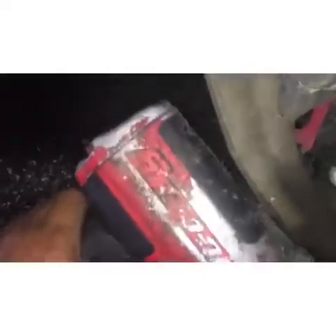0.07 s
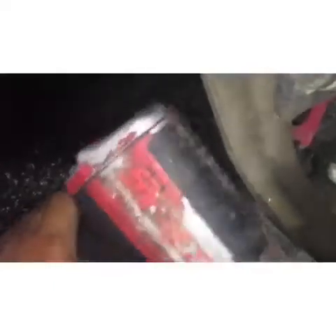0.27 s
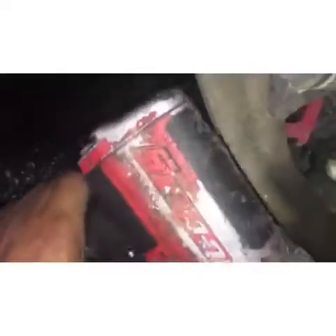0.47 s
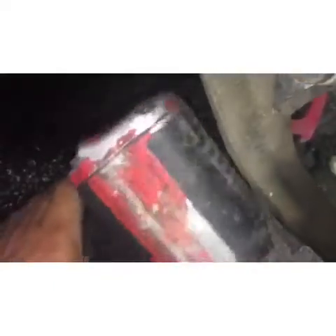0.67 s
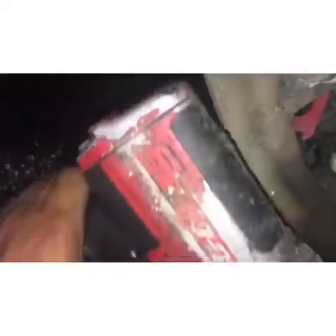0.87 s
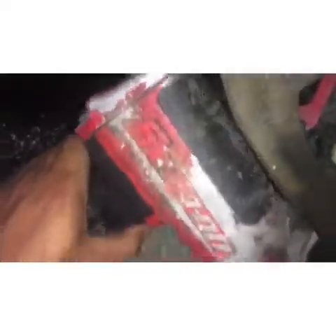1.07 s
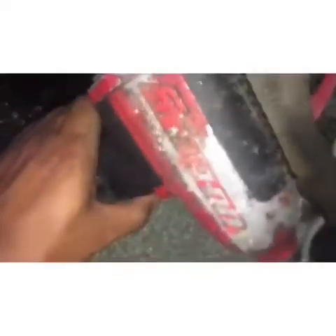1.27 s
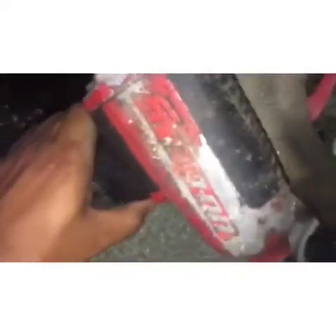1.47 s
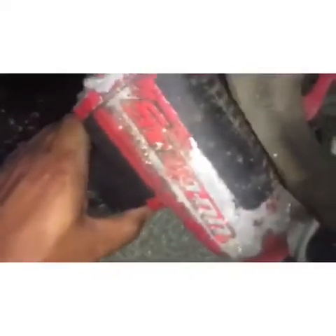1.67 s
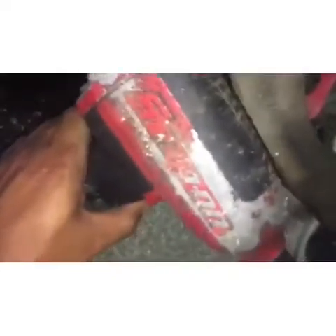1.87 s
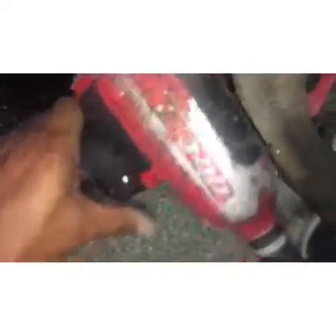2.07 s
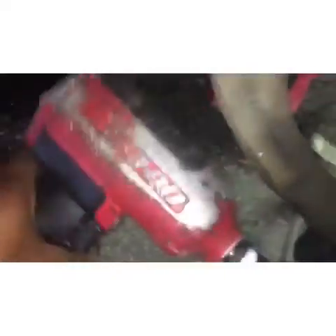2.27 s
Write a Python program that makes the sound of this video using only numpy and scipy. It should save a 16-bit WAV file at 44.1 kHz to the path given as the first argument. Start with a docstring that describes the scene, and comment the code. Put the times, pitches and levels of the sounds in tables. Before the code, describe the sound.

An air impact wrench, very close. A low wavering machine hum sinks as air hisses in at 0.15 s; sharp cracking blows with bassy thumps run 0.2-0.4 s, then steel rings on. A second burst comes at 0.7-0.8 s, ringing again. From 1.1 to 2.05 s it hammers steadily, nearly thirty blows a second, until the freed motor whines up briefly and runs down by 2.3 s.

```python
"""Under a car in a workshop, very close to an air impact wrench on a tight bolt: a wavering machine hum, which
the recorder's gain control turns down (a drawn level curve) as the hammering starts. Two short bursts, then a
long run until the bolt gives. Each blow is a noise crack and clang through case resonances, a thump gliding
down in pitch, a bounce and a rattle. In the pauses struck steel rings on as wandering sines; exhaust air is
coloured noise. At the end the freed motor whines in harmonics and runs down; a faint workshop tail lies behind."""
import sys
import numpy as np
from scipy import signal
from scipy.fft import rfft, irfft
from scipy.io import wavfile

SR = 44100
rng = np.random.default_rng(int(sys.argv[2]) if len(sys.argv) > 2 else 0)


def to_wav(s):
    """Save 16-bit WAV."""
    ch = np.atleast_2d(s).T  # columns
    pcm = np.round(np.clip(ch, -1, 1) * 32767)  # PCM
    wavfile.write(sys.argv[1], SR, pcm.astype(np.int16))


N = 101429
TIME = np.arange(N) / SR  # s

# level of the workshop hum as heard, turned down by the recorder's gain control when the hammering
# starts, partly recovering later: (time [s], level [dB])
HUM_LEVEL = [(0, -34.5), (.19, -34.5), (.3, -57), (1.0, -64), (2.3, -55.5)]
# spectrum of the low workshop noise: (frequency [Hz], relative density [dB per Hz])
BACKGROUND_SPECTRUM = [(30, -4), (170, 0), (300, -14), (450, -31), (1200, -28), (2500, -41), (15000, -60)]
HUM_HZ, HUM_WOBBLE, HUM_OCTAVE_DB = 106, .03, -19  # wobble: rms fraction of pitch
BACKGROUND_DB = -6  # relative to the hum

# spectrum of the diffuse workshop tail: (frequency [Hz], relative density [dB per Hz])
ROOM_SPECTRUM = [(60, -15), (500, -9), (1500, 0), (4300, 0), (5200, -5), (9000, -8), (11000, -13),
                 (16000, -17)]
ROOM_DB, ROOM_T60_S = -29, 0.61

# long ring of the bolted steel parts: (frequency [Hz], relative level [dB], t60 [s])
STEEL_MODES = [(688, -5, 0.33), (834, -5, 0.26), (1139, 1.5, 0.64), (1387, 0, 0.34), (1707, -2.5, 0.35),
               (1924, -4, 0.43), (2546, -11, 0.59), (3450, -12.5, .4), (4320, -11.5, 0.67)]
STEEL_DB, STEEL_MAIN_HZ, STEEL_WANDER_HZ = -23.5, 1141, 2.5

# trigger pulls: (valve opens [s], air fully on [s], hammering ends [s],
#                 exhaust level [dB], drive of the main steel mode [dB])
PULLS = [(0.148, 0.219, 0.412, -19.5, -4.5), (0.628, 0.66, 0.82, -22, 2.5), (1.018, 1.033, 2.050, -31, 5)]

# motor as the bolt turns and after: (time [s], vane rate [Hz], whine level [dB], air level [dB])
MOTOR_RUN = [(1.899, 380, -48, -56), (2.01, 448, -38, -54), (2.062, 512, -39, -36), (2.08, 485, -41, -40),
             (2.097, 415, -31, -38), (2.135, 298, -32.5, -40), (2.155, 338, -39, -37.5),
             (2.19, 322, -44, -45), (2.258, 298, -48, -49), (2.30, 285, -66, -55)]
# harmonics of the vane rate, from the first up: (relative level [dB])
MOTOR_ORDERS_DB = [0, -6, -14, -13, -11, -12, -17]
# spectrum of the air puffed by the vanes: (frequency [Hz], relative density [dB per Hz])
MOTOR_AIR_SPECTRUM = [(90, -20), (300, -6), (450, -10), (720, -3), (1500, -7), (4200, -14), (5000, -20),
                      (15000, -35)]
START_HZ, START_DB, START_FADE_S = 315, -35, .04
MOTOR_WOBBLE = .015  # rms fraction of the vane rate
MOTOR_BLUR_AT_S, MOTOR_BLUR_CYCLES = 2.14, .3
PORT_HZ, PORT_WIDTH_HZ, PORT_GAIN = 800, 240, 2.8

# spectrum of the exhaust rush: (frequency [Hz], relative density [dB per Hz])
EXHAUST_SPECTRUM = [(60, 4), (550, -8.5), (900, -0.5), (1500, -1), (2800, -4), (4500, -7), (10000, -8.5),
                    (16000, -11)]
VALVE_DB, VALVE_HZ, VALVE_WIDTH_HZ, VALVE_OPEN_S = -38, 6670, 5200, .008
AIR_RELEASE_DB_PER_S, AIR_OPENING_POWER = 711, 2.6

# hammer blows: (time [s], relative crack level [dB], relative clang level [dB], relative thump level [dB])
BLOWS = [(0.2069, -4, -16, -57), (0.2601, -5, -15, -23.5), (0.286, -1.5, -13.5, -21),
         (0.312, -9, -30, -19.5), (0.3396, 1, -11.5, -13.5), (0.369, 1.5, -16, -15.5), (0.4, 3, -16.5, -18),
         (0.689, -4, -13, -21.5), (0.7206, -2.5, -18, -20), (0.7541, 2, -15, -22.5),
         (0.7853, 0.5, -17.5, -19.5), (0.818, -2, -17.5, -24), (1.086, 1.5, -14, -18),
         (1.1159, -3, -16.5, -18), (1.1497, -1, -15, -21), (1.1815, -1, -16, -21), (1.216, 0, -17.5, -21),
         (1.251, -2.5, -13.5, -29), (1.2856, -1.5, -17.5, -23), (1.3211, -1.5, -17.5, -25.5),
         (1.358, -2.5, -18, -19.5), (1.397, -1.5, -17, -23.5), (1.436, 0.5, -16, -21.5),
         (1.476, -3.5, -17, -22.5), (1.513, -3.5, -22.5, -22.5), (1.5505, -1.5, -17, -19.5),
         (1.589, 0, -17, -21), (1.6273, -1, -16.5, -18.5), (1.6645, -1, -16.5, -20),
         (1.7019, -0.5, -17, -32), (1.7388, -0.5, -17, -20.5), (1.7786, -0.5, -18, -21.5),
         (1.814, -4.5, -17, -17), (1.8475, -4, -20, -20.5), (1.8806, -1.5, -22.5, -20.5),
         (1.9124, -1, -17.5, -20), (1.9476, -4, -21.5, -16.5), (1.9862, -1.5, -22.5, -34),
         (2.0424, -4, -24, -25.5)]
SHUDDER_DB, SHUDDER_DECAY_S, SHUDDER_LOW_HZ, SHUDDER_HIGH_HZ = -5.5, .015, 45, 170
# the pitch and times of a thump hold before its stretch
THUMP_DROP_HZ, THUMP_FALL_S, THUMP_END_HZ = 1050, .00078, 20
THUMP_LAG_S, THUMP_RISE_S, THUMP_DECAY_S = 0.00065, 0.00066, 0.0096
THUMP_STRETCH_PER_DB, THUMP_USUAL_DB, THUMP_VARY = .015, -21, .15
THUMP_DB, THUMP_ROUGH = 11.5, 0.13

# lighter knocks of the trigger, hammer and loose socket: (time [s], relative level [dB])
KNOCKS = [(0.1518, -32), (0.2113, 1), (0.2944, -9.5), (0.2984, 2.5), (0.318, -5), (0.323, -1.5), (0.33, -4),
          (0.3513, -1), (0.3822, -4), (0.4412, -6.5), (0.659, -11), (0.6691, -4), (0.6734, -3),
          (0.7039, -2), (0.709, -3), (0.7358, -2.5), (0.7971, -2.5), (1.037, -11.5), (1.0526, -4),
          (1.07, -3.5), (1.075, -1.5), (1.0993, -2.5), (1.1323, -5.5), (1.1673, -7), (1.83, -6.5),
          (1.8624, -5.5), (1.973, -8), (1.999, -17), (2.0248, -15.5), (2.0857, -16), (2.1518, -23.5),
          (2.2108, -30)]
# spectrum of the bright steel crack: (frequency [Hz], relative density [dB per Hz])
CRACK_SPECTRUM = [(300, -44.5), (1500, -10.5), (2600, -0.5), (4300, 3.5), (4900, -0.5), (6000, 4),
                  (7400, -1.5), (8600, 3), (9800, 4.5), (10400, -3.5), (11300, 0.5), (13500, -4),
                  (16000, -16.5)]
# spectrum of the slower steel clang: (frequency [Hz], relative density [dB per Hz])
CLANG_SPECTRUM = [(100, 0.5), (250, -3), (450, -5), (700, -0.5), (950, -4.5), (1200, 1.5), (1550, -1),
                  (2100, -3.5), (2700, -11), (5000, -18)]
# short resonances of the hammer case and socket: (frequency [Hz], width [Hz], middle gain [dB])
CASE_MODES = [(1585, 144, -9.5), (2004, 60, -4.5), (2490, 28.2, -3.5), (3140, 50, -5), (3547, 40, -4.5),
              (4180, 63, -11), (5640, 78, -9), (6520, 210, -14), (8430, 84, -4), (9440, 77, -12)]
CASE_VARY_DB, CASE_VARY_PER_S = 5, 25
CRACK_DB, CRACK_RISE_S, CRACK_DECAY_S = -6.5, .00045, 0.0016
CRACK_TAIL_DB, CRACK_TAIL_S = -9, 0.0051
CLANG_DB, CLANG_RISE_S, CLANG_DECAY_S = 3.5, 0.0011, 0.0061
KNOCK_CRACK_DB, KNOCK_CLANG_DB = 1, -13.5
BOUNCE_S, BOUNCE_SPREAD_S, BOUNCE_DB, BOUNCE_CLANG_DB = 0.0063, 0.00052, -6, -5.5
RATTLE_AFTER_S, RATTLE_WIDTH_S, RATTLE_SPREAD_S = .0225, .0033, .002
RATTLE_PER_S, RATTLE_UNEVEN_DB = 600, 2.5  # rate at the top of the swell
RATTLE_DB, RATTLE_CLANG_DB = -22, -25

LOW_CUT_HZ, CEILING, CUTOFF_HZ = 27, .7, 16000


def from_db(db):
    """Decibels to gain."""
    return 10 ** (np.asarray(db) / 20)


def rms_one(x):
    """Scale to unit rms."""
    return x / np.sqrt(np.mean(x ** 2) + 1e-20)


def colour(x, points):
    """Causal minimum-phase filter with the given spectrum and unit power gain."""
    size = 4096
    hz, db = np.transpose(points)
    bins_hz = np.fft.rfftfreq(size, 1 / SR)
    gain = rms_one(from_db(np.interp(np.log(bins_hz + 1), np.log(hz), db)))
    # folding the cepstrum forward in time makes the filter causal
    cepstrum = irfft(np.log(gain))
    cepstrum[1:size // 2] *= 2
    cepstrum[size // 2 + 1:] = 0
    impulse = irfft(np.exp(rfft(cepstrum)))
    return signal.fftconvolve(x, impulse)[:N]


def noise():
    """White noise."""
    return rng.standard_normal(N)


def drift(rate):
    """Random wander of unit rms, low-passed at rate in Hz."""
    return rms_one(signal.sosfilt(signal.butter(2, rate, fs=SR, output="sos"), noise()))


def resonance(x, hz, width_hz):
    """Two-pole resonance with gain 1 on top."""
    r = np.exp(-np.pi * width_hz / SR)
    feed = np.array([1, 0, -1]) * (1 - r * r) / 2
    return signal.lfilter(feed, [1, -2 * r * np.cos(2 * np.pi * hz / SR), r * r], x)


def strikes(s, db):
    """Impulses of energy at the given times."""
    return np.bincount(np.clip(s * SR, 0, N - 1).astype(int), from_db(db) ** 2, N)


def dying(energy, decay_s):
    """Each impulse of energy dies away exponentially; decay_s is the time constant of its amplitude."""
    return signal.lfilter([1], [1, -np.exp(-2 / (decay_s * SR))], energy + 1e-18)


def background():
    """Around the car, a wavering machine hum with its octave lies over low workshop noise."""
    phase = 2 * np.pi * np.cumsum(HUM_HZ * (1 + HUM_WOBBLE * drift(25.3))) / SR
    hum = rms_one(np.sin(phase) + from_db(HUM_OCTAVE_DB) * np.sin(2 * phase))
    low_noise = from_db(BACKGROUND_DB) * colour(noise(), BACKGROUND_SPECTRUM)
    return from_db(np.interp(TIME, *np.transpose(HUM_LEVEL))) * (hum + low_noise)


def workshop(x):
    """The workshop answers with a faint diffuse tail: exponentially fading coloured noise."""
    tail = colour(noise(), ROOM_SPECTRUM) * from_db(-60 * TIME / ROOM_T60_S)
    return from_db(ROOM_DB) * signal.fftconvolve(x, tail / np.linalg.norm(tail))[:N]


def steel(hits):
    """The bolted parts store the energy of the blows and ring on; each pull strikes their main mode differently."""
    main_db = sum(ring_db * (TIME > start) * (TIME < end + .03) for start, _, end, _, ring_db in PULLS)
    out = np.zeros(N)
    for hz, db, t60 in STEEL_MODES:
        decay_s = t60 / np.log(1000)
        is_main = np.isclose(hz, STEEL_MAIN_HZ, rtol=.1)
        drive = hits * from_db(main_db * is_main)
        stored = dying(drive ** 2, decay_s) * 2 / (decay_s * SR)
        phase = 2 * np.pi * np.cumsum(hz + STEEL_WANDER_HZ * drift(62.5)) / SR
        out += from_db(db + STEEL_DB) * np.sqrt(stored) * np.sin(phase)
    return out


def motor_start():
    """A brief low tone as the motor first spins up from rest: a fading sine of steady pitch."""
    age = np.maximum(TIME - PULLS[0][0], 0)
    return from_db(START_DB) * np.exp(-age / START_FADE_S) * np.sin(2 * np.pi * START_HZ * age)


def motor():
    """Vanes whine and puff air through the resonant exhaust port; they speed up as the bolt gives, then run down."""
    s, hz, whine_db, air_db = np.transpose(MOTOR_RUN)
    vane_hz = np.interp(TIME, s, hz) * (1 + MOTOR_WOBBLE * drift(103))
    phase = 2 * np.pi * np.cumsum(vane_hz) / SR
    # coasting vanes flutter: the overtones blur
    coasting = (TIME > MOTOR_BLUR_AT_S) * np.minimum((TIME - MOTOR_BLUR_AT_S) / 0.027, 1)
    blur = 2 * np.pi * MOTOR_BLUR_CYCLES * coasting
    whine = np.zeros(N)
    for k, order_db in enumerate(MOTOR_ORDERS_DB):
        whine += from_db(order_db) * np.sin((k + 1) * phase + k * blur * drift(60))
    whine = whine + PORT_GAIN * resonance(whine, PORT_HZ, PORT_WIDTH_HZ)
    air = colour(noise() * (1 + .5 * np.cos(phase)), MOTOR_AIR_SPECTRUM)
    fade_in = np.clip((TIME - s[0]) / 0.07, 0, 1)
    whine_gain = from_db(np.interp(TIME, s, whine_db))
    air_gain = from_db(np.interp(TIME, s, air_db))
    return fade_in * (whine_gain * whine + air_gain * air)


def exhaust():
    """The valve opens with a thin hiss, then air rushes through while the trigger is held."""
    rush, valve = np.zeros(N), np.zeros(N)
    for start, on, off, db, _ in PULLS:
        release = from_db(-AIR_RELEASE_DB_PER_S * np.maximum(TIME - off, 0))
        opening = np.clip((TIME - start) / max(on - start, .002), 0, 1) ** AIR_OPENING_POWER
        rush += release * from_db(db) * opening
        valve += release * np.clip((TIME - start) / VALVE_OPEN_S, 0, 1)
    narrow = resonance(noise(), VALVE_HZ, VALVE_WIDTH_HZ)
    hiss = rms_one(resonance(narrow, VALVE_HZ, 2 * VALVE_WIDTH_HZ))
    return rush * colour(noise(), EXHAUST_SPECTRUM) + from_db(VALVE_DB) * valve * hiss


def shudder():
    """Tool and braced parts shake briefly after each blow: low noise; quick heavy blows pile up into a rumble."""
    s, _, _, db = np.transpose(BLOWS)
    band = signal.butter(2, [SHUDDER_LOW_HZ, SHUDDER_HIGH_HZ], "band", fs=SR, output="sos")
    rumble = rms_one(signal.sosfilt(band, noise()))
    return np.sqrt(dying(strikes(s, db + SHUDDER_DB), SHUDDER_DECAY_S)) * rumble


def thumps():
    """Each blow jolts the tool: a sine drops fast into the bass, slower after a hard blow, never twice alike."""
    out = np.zeros(N)
    for s, _, _, db in BLOWS:
        vary = THUMP_VARY * rng.standard_normal()
        stretch = np.exp(THUMP_STRETCH_PER_DB * (db - THUMP_USUAL_DB) + vary)
        age = np.maximum(TIME - s - THUMP_LAG_S, 0) / stretch
        cycles = THUMP_DROP_HZ * THUMP_FALL_S * np.log1p(age / THUMP_FALL_S) + THUMP_END_HZ * age
        swell = (1 - np.exp(-age / THUMP_RISE_S)) * np.exp(-age / THUMP_DECAY_S)
        out += from_db(db + THUMP_DB) * swell * np.sin(2 * np.pi * cycles)
    return out * (1 + THUMP_ROUGH * drift(300))


def rattle():
    """Uneven small contacts as the hammer rides over its cam between blows, only while the motor drives it."""
    blow_s = np.array(BLOWS)[:, 0]
    middles = blow_s + RATTLE_AFTER_S + RATTLE_SPREAD_S * rng.standard_normal(len(BLOWS))
    swell = sum(np.exp(-.5 * ((TIME - s) / RATTLE_WIDTH_S) ** 2) for s in middles)
    driven = sum((TIME > on) & (TIME < off) for _, on, off, _, _ in PULLS)
    ticks = rng.random(N) < RATTLE_PER_S / SR
    return swell * driven * ticks * from_db(RATTLE_UNEVEN_DB * noise()) ** 2


def contacts():
    """Blows, bounces, knocks and rattle give bright crack and slower clang noise, stirring the case unevenly."""
    s, crack_db, clang_db, _ = np.transpose(BLOWS)
    knock_s, knock_db = np.transpose(KNOCKS)
    bounce_s = s + BOUNCE_S + BOUNCE_SPREAD_S * rng.standard_normal(len(s))
    wind_up = rattle()

    # energy of the hard contacts, heard as cracks
    hard = strikes(s, crack_db) + strikes(bounce_s, crack_db + BOUNCE_DB)
    hard = hard + strikes(knock_s, knock_db + KNOCK_CRACK_DB)
    hard = hard * from_db(CRACK_DB) ** 2 + wind_up * from_db(RATTLE_DB) ** 2
    # energy of the heavy contacts, heard as clangs
    heavy = strikes(s, clang_db) + strikes(bounce_s, clang_db + BOUNCE_CLANG_DB)
    heavy = heavy + strikes(knock_s, knock_db + KNOCK_CLANG_DB)
    heavy = heavy * from_db(CLANG_DB) ** 2 + wind_up * from_db(RATTLE_CLANG_DB) ** 2

    # a slow decay minus a fast one gives a soft onset
    crack_body = np.abs(dying(hard, CRACK_DECAY_S) - dying(hard, CRACK_RISE_S))
    crack_tail = from_db(CRACK_TAIL_DB) ** 2 * dying(hard, CRACK_TAIL_S)
    crack = np.sqrt(crack_body + crack_tail)
    clang = np.sqrt(np.abs(dying(heavy, CLANG_DECAY_S) - dying(heavy, CLANG_RISE_S)))
    hits = colour(crack * noise(), CRACK_SPECTRUM) + colour(clang * noise(), CLANG_SPECTRUM)

    case = np.zeros(N)
    for hz, width_hz, db in CASE_MODES:
        gain = from_db(db + CASE_VARY_DB * drift(CASE_VARY_PER_S))
        case += gain * resonance(hits, hz, width_hz)
    return hits + case


def scene():
    """The workshop around, the ringing steel, and the wrench very close."""
    hits = contacts()
    wrench = hits + thumps() + shudder() + exhaust() + motor_start() + motor()
    return (background() + workshop(wrench) + steel(hits) + wrench)[None]


def record(dry):
    """At the microphone the deepest bass is lost, peaks are rounded and the top is cut."""
    low_cut = signal.butter(4, LOW_CUT_HZ, "high", fs=SR, output="sos")
    thin = signal.sosfilt(low_cut, dry)
    rounded = CEILING * np.tanh(thin / CEILING)
    top_cut = signal.ellip(12, .2, 80, CUTOFF_HZ, fs=SR, output="sos")
    return signal.sosfilt(top_cut, rounded)


dry = scene()
out = record(dry)
to_wav(out)
```